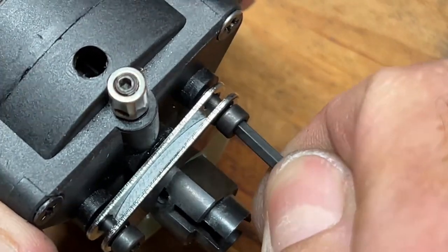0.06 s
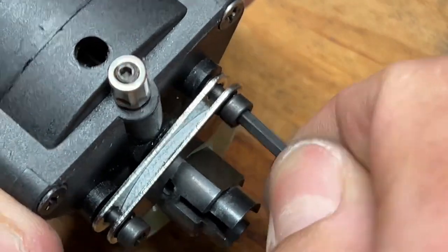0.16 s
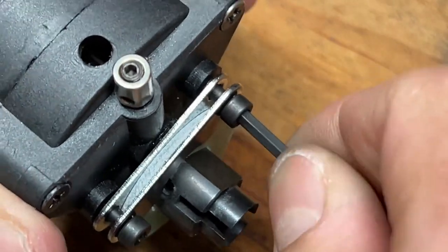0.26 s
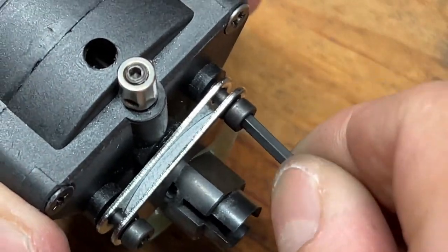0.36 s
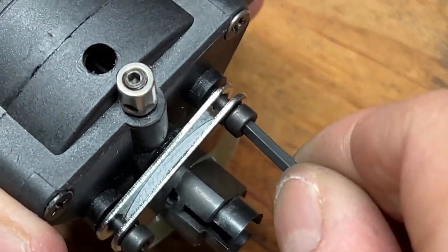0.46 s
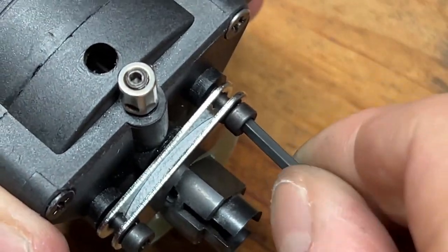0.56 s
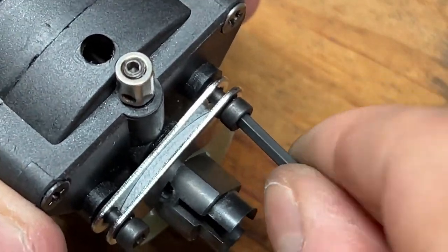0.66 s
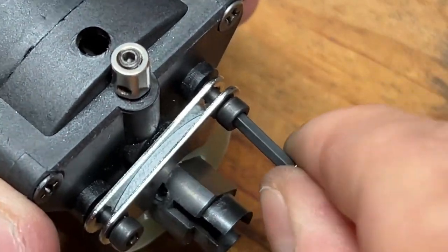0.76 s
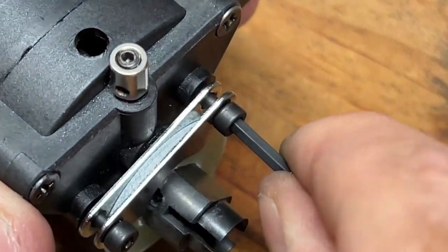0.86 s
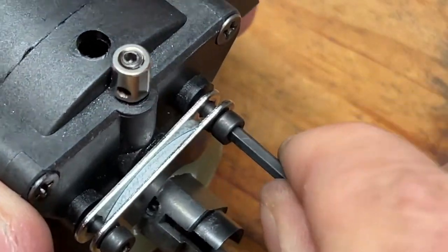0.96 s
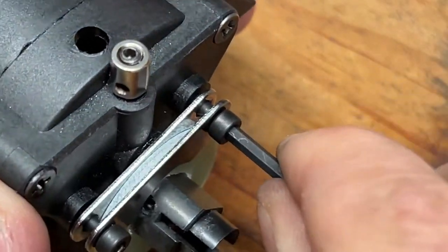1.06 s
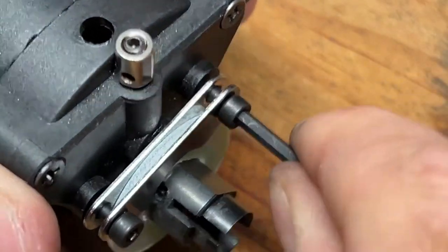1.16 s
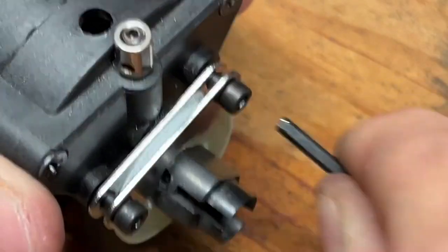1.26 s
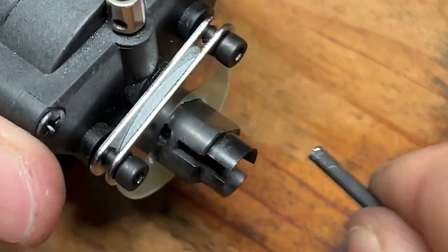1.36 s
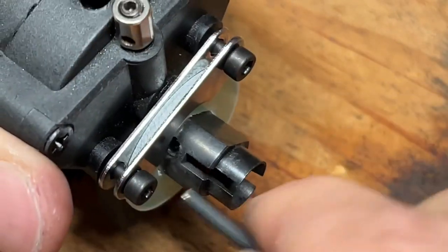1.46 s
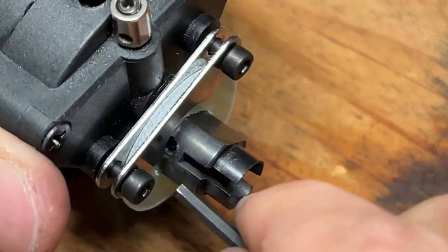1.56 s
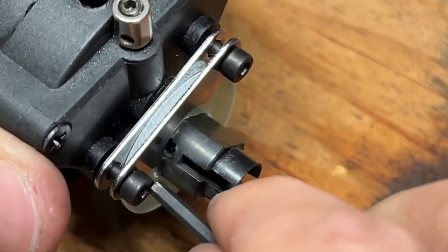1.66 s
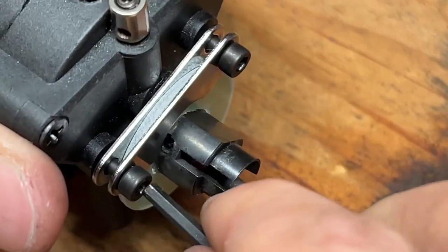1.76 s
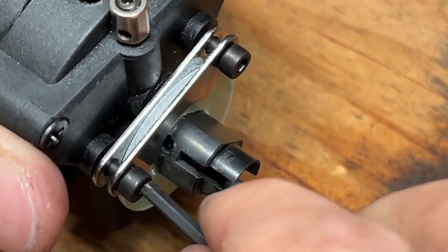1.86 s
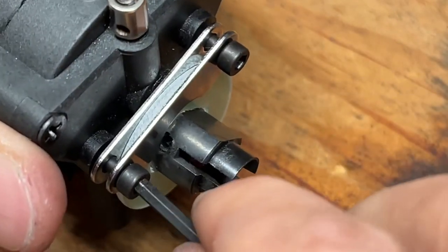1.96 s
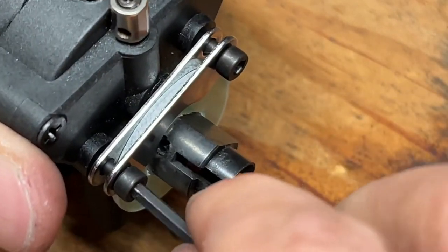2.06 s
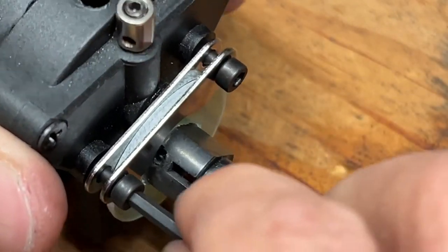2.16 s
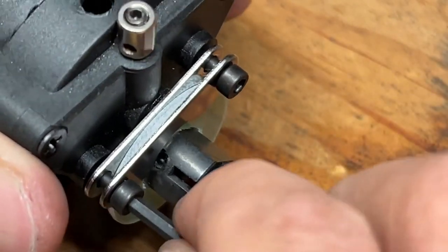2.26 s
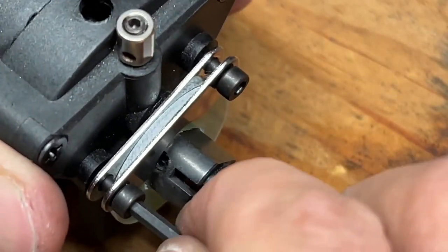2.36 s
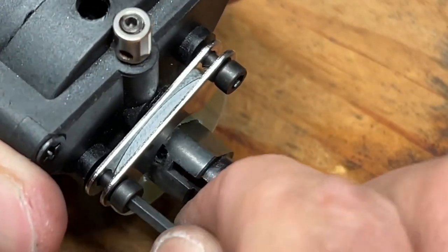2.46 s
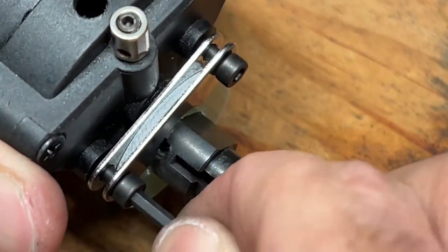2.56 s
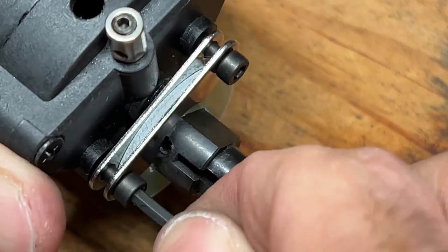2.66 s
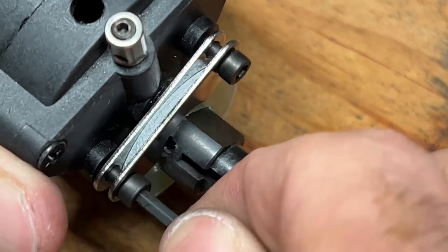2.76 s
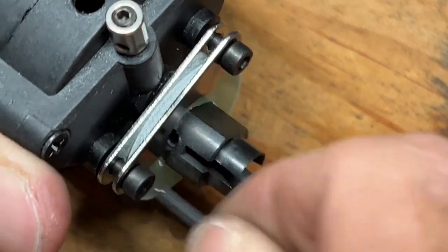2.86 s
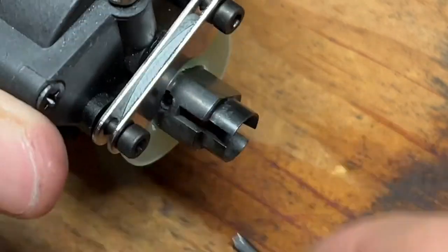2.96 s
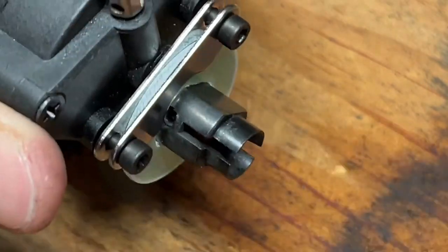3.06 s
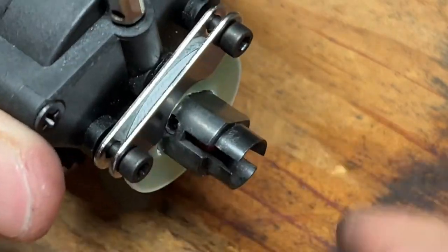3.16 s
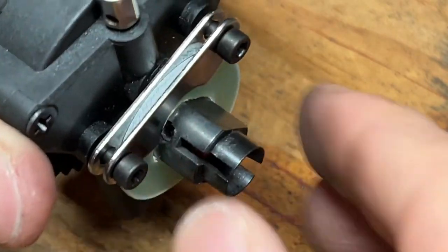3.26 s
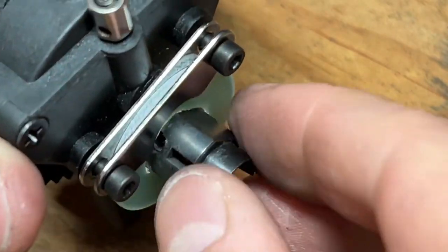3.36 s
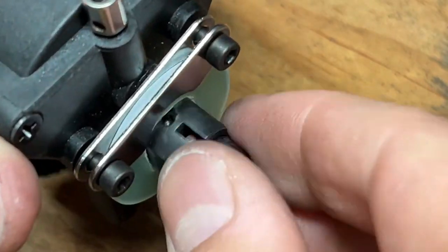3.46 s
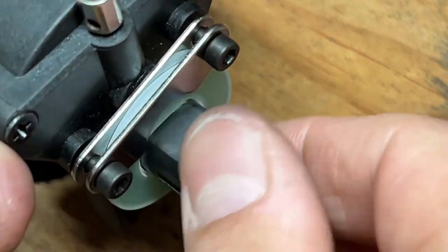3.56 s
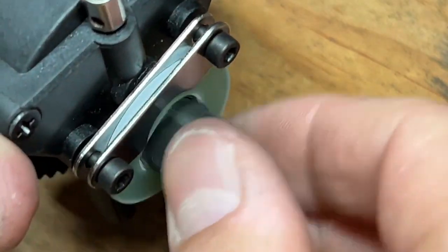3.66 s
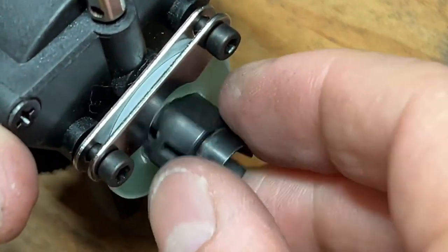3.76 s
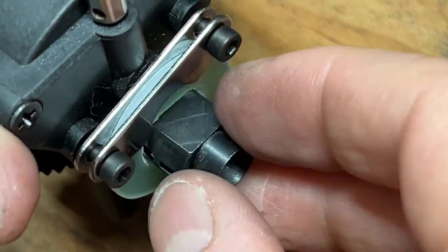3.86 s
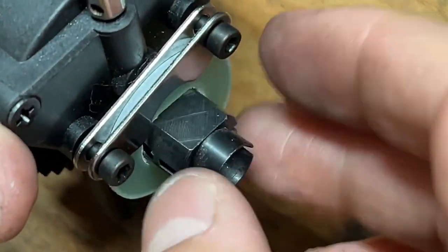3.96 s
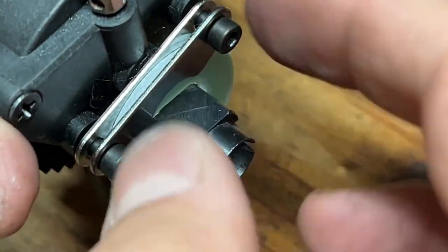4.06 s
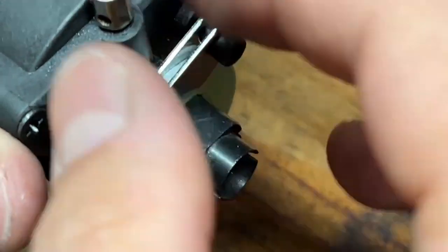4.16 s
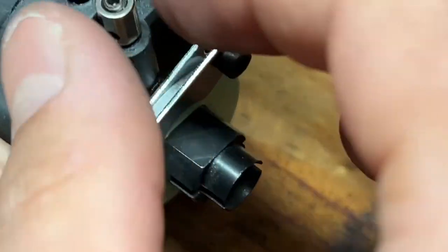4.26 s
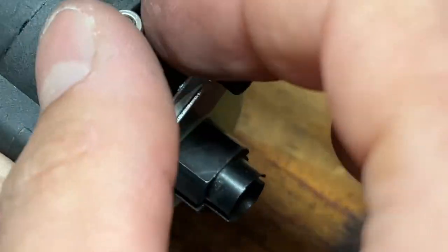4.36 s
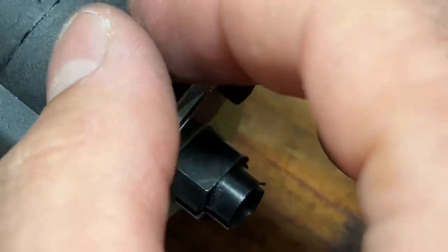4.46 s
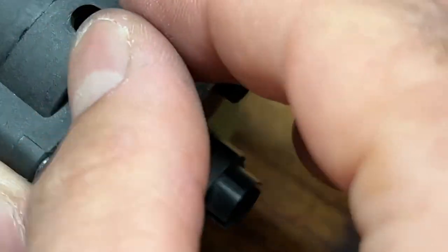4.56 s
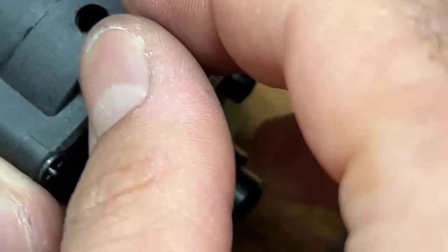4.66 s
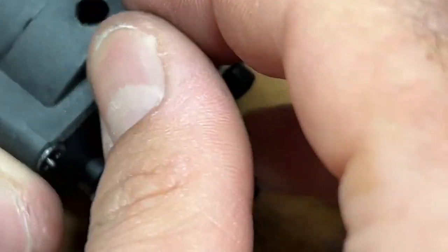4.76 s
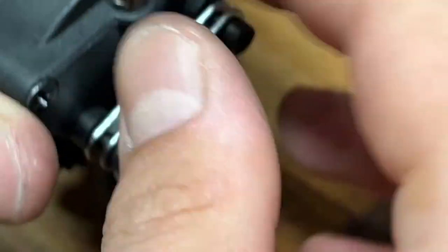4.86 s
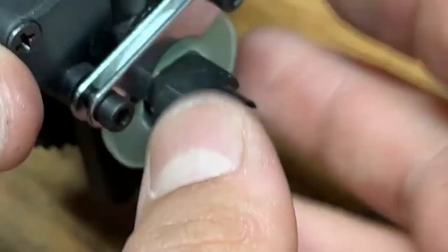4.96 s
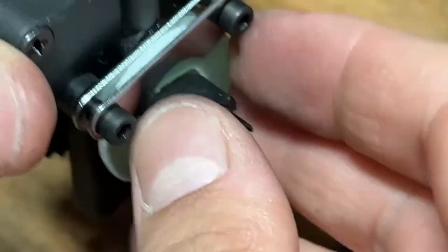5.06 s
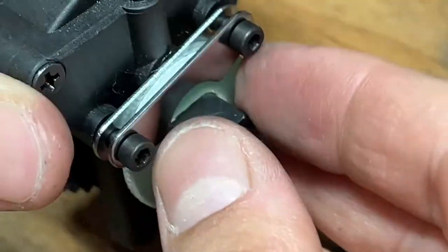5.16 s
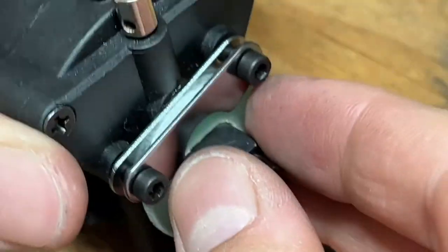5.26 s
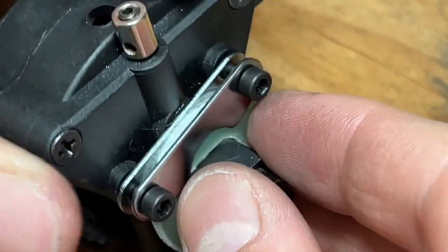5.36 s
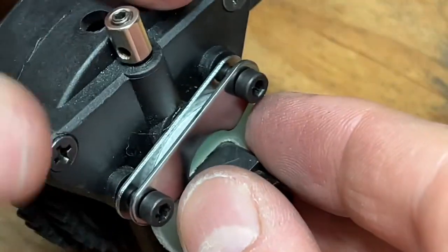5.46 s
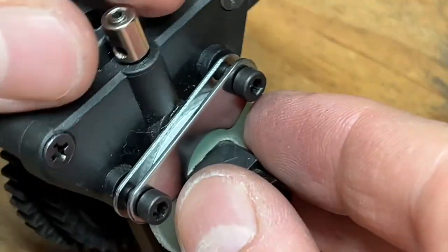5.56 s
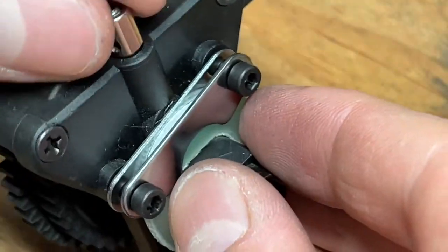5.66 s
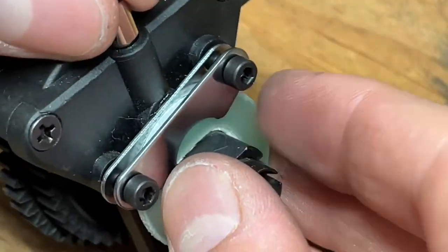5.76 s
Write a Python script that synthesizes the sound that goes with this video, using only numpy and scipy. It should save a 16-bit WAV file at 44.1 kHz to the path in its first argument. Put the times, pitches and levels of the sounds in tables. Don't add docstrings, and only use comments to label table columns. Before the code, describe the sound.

Close stereo phone pickup, small indoor workspace with soft low rumble and little reverberation. First near silence, then thin steel-on-steel clicks and short scrapes around one to two seconds. Just after three seconds a metal tool drops and rattles on wood, the loudest moment together with a later low hollow knock. Between them are two short gritty turns, faint ticks and skin rubs.

```python
import sys
import numpy as np
from scipy import signal
from scipy.fft import rfft, irfft
from scipy.io import wavfile
from scipy.ndimage import uniform_filter1d

SR = 44100
rng = np.random.default_rng(int(sys.argv[2]) if len(sys.argv) > 2 else 0)


def master(y):
    cut = np.clip(np.atleast_2d(y).T, -1, 1)
    pcm = np.round(cut * 32767)
    wavfile.write(sys.argv[1], SR, pcm.astype(np.int16))


def convert_level_to_amplitude(level_db):
    exponent = np.asarray(level_db, float) / 20
    return 10 ** exponent


N = 256484


def on_log(table, hz):
    f, v = np.transpose(table)
    return np.interp(np.log(np.maximum(hz, 1)), np.log(f), v)


def unit(x):
    return x / np.sqrt(np.mean(x ** 2))


def add(out, s, sound):
    i = int(s * SR)
    out[i:i + len(sound)] += sound[:N - i]


def bandpass(x, order, low_hz, high_hz):
    return signal.sosfilt(signal.butter(order, [low_hz, high_hz], "band", fs=SR, output="sos"), x)


def walk(rate):
    hold = int(SR / rate)
    steps = np.repeat(rng.standard_normal(N // hold + 1), hold)
    return 1.3 * uniform_filter1d(uniform_filter1d(steps, hold), hold)[:N]


# f/Hz, level/dB per Hz
ROOM_TONE = [(12, -46.5), (22, -18.5), (51, -5.5), (71, -1.5), (114, -15), (160, -17), (265, -27.5),
             (600, -31), (1050, -30.5), (1350, -38.5), (1750, -40.5), (2050, -49), (3300, -54.5),
             (7500, -57.5)]
# f/Hz, level/dB
AIR_TREBLE = [(7500, -1.5), (9000, -4.5), (12000, -3), (13500, -6), (16500, -15)]
# f/Hz, likeness of left and right/0-1
ROOM_LIKENESS = [(60, 1), (130, .95), (290, 0.6), (640, 0.5), (1410, 0.12), (2400, 0.6), (6820, 1),
                 (11000, 1), (16000, 0.2)]


def room():
    level_db = -57.5
    hz, out, swell = np.fft.rfftfreq(N, 1 / SR), 0, walk(0.45)
    left, other = rfft(rng.standard_normal((2, N)))
    like = np.clip(on_log(ROOM_LIKENESS, hz), 0, 1)
    right = like * left + np.sqrt(1 - like ** 2) * other
    both = convert_level_to_amplitude(on_log(ROOM_TONE, hz) + on_log(AIR_TREBLE, hz)) * np.array([left, right])
    octave = np.log2(np.maximum(hz, 16) / 16)
    for k in np.arange(0, 11, .5):
        share = np.clip(1 - 2 * np.abs(octave - k), 0, 1)
        wander_db = .4 * swell + 0.52 * walk(3.1) + 1.8 * walk(3.3) * (k < 3.6)
        out = out + irfft(both * share, N) * convert_level_to_amplitude(wander_db)
    return unit(out) * convert_level_to_amplitude(level_db)


# f/Hz, t60/s
WALL_T60 = [(200, 0.61), (600, 0.24), (1500, 0.36), (4000, .25), (12000, 0.046)]


def echo(x):
    wall_db, bench_db, bench_t60_s = -22.5, -9.5, 0.041
    t, tail = np.arange(SR // 2) / SR, 0
    common, *own = rng.standard_normal((3, len(t)))
    for hz in 125. * 2 ** np.arange(7):
        unlike = 1.4 if hz < 1500 else .25
        octave = bandpass(common + unlike * np.array(own), 2, hz / 2 ** .5, hz * 2 ** .5)
        tail = tail + octave * convert_level_to_amplitude(-60 * t / on_log(WALL_T60, hz))
    tail = tail * np.clip(t / 0.014, 0, 1)
    highpass = signal.butter(1, 700, "high", fs=SR, output="sos")
    early = signal.sosfilt(highpass, common + 1.5 * np.array(own))
    early = early * convert_level_to_amplitude(-60 * t / bench_t60_s) * np.clip(t / 0.0015, 0, 1)
    both = convert_level_to_amplitude(wall_db) * unit(tail) + convert_level_to_amplitude(bench_db) * unit(early)
    return signal.fftconvolve(x[None], both / np.sqrt(len(t)), axes=1)[:, :N]


def wide_board(x):
    level_db, t60_s = -17, .025
    t = np.arange(SR // 10) / SR
    scatter = rng.standard_normal(len(t)) * convert_level_to_amplitude(-60 * t / t60_s)
    scatter = bandpass(scatter, 1, 400, 3242)
    side = signal.fftconvolve(x, unit(scatter) / np.sqrt(len(t)))[:N] * convert_level_to_amplitude(level_db)
    return np.array([side, -side])


# f/Hz, left lead/rad
LEFT_LEAD = [(0, 0), (300, -.1), (430, .4), (650, 0), (760, .7), (850, 1.5), (980, -.3), (1300, -.4),
             (1600, .2), (2000, -.1), (3100, .6), (5200, .3), (6200, 0), (7900, .25), (8600, -.3),
             (10000, -2.8), (10600, -3.6), (12100, -6.3), (13400, -9.2), (14100, -9.8), (16500, -14.5)]
# f/Hz, left minus right level/dB
LEFT_MINUS_RIGHT = [(60, 0.5), (110, -2), (200, 0.5), (380, -0.5), (700, 2), (1290, -0.5), (2380, -0.5),
                    (4400, -0.5), (8120, 0.5), (15000, -0.5)]


def ports(x):
    hz = np.fft.rfftfreq(N, 1 / SR)
    lead = np.interp(hz, *np.transpose(LEFT_LEAD))
    half = np.exp(.5j * lead) * convert_level_to_amplitude(on_log(LEFT_MINUS_RIGHT, hz) / 2)
    return irfft(rfft(x) * np.array([half, 1 / half]), N)


def strike(db, ms, modes, spot_db, chatter, spread, low_hz, length, swell=.01, top_hz=17000):
    hz, mode_db, t60 = np.repeat(np.transpose(modes), 3, axis=1)[:, :, None]
    t = np.arange(int(length * SR)) / SR
    spot, detune = rng.standard_normal((2, len(hz), 1))
    ring = convert_level_to_amplitude(mode_db + spot_db * spot) * np.sin(2 * np.pi * hz * (1 + spread * detune) * t)
    ring = ring * (1 - np.exp(-(hz * t / swell) ** 2))
    ring = np.sum(ring * np.exp(-np.log(1000) * t / np.maximum(t60, .005)), axis=0)
    u = t[:1024] * 1000 / max(ms, .02)
    hits = rng.standard_normal(1024) * convert_level_to_amplitude(6.0 * rng.exponential(size=1024))
    push = u * np.exp(-u) * (1 - chatter + chatter * unit(hits))
    sound = bandpass(signal.fftconvolve(ring, push), 2, low_hz, top_hz)
    return sound * convert_level_to_amplitude(db) / np.abs(sound).max()


# t/s, peak level/dB, contact/ms
BOX_KNOCKS = [
    (2.08, -55, 0.51),
    (3.359, -59.5, 0.84),
    (5.337, -18.5, 0.44),
    (5.788, -50, 11),
]
# f/Hz, level/dB, t60/s
HOLLOW_MODES = [(110.3, -10.5, 0.14), (156.3, -5, 0.12), (278.6, -4, 0.11), (335.3, 6, 0.076),
                (334, -28, 0.75), (441.2, -0.5, 0.072), (504, 9.5, 0.037), (594, 1, 0.029),
                (697, -7, 0.069), (854, -10, 0.027), (1180, -15, 0.025), (1844, -22, 0.019),
                (2630, -27, 0.01)]


def knocks():
    out = np.zeros(N)
    for s, db, ms in BOX_KNOCKS:
        add(out, s, strike(db, ms * 0.093, HOLLOW_MODES, 0.36, 0, 0.012, 70, length=0.57, swell=1.0))
    return out


def resonate(x, peaks):
    return unit(sum(convert_level_to_amplitude(db) * signal.lfilter(*signal.iirpeak(hz, hz / width, fs=SR), x)
                    for hz, width, db in peaks))


# f/Hz, width/Hz, level/dB
RUB_HIGH = [(5000, 300, 5.5), (6170, 1100, 2), (7430, 1200, -0.5), (9015, 740, -4), (10640, 1100, -4.5),
            (11600, 1400, -2), (13180, 6600, -6), (15200, 1100, 3)]


def slide(slips, t, db, treble_db, low_peaks, grip):
    part = slips[int(t[0] * SR):][:len(t)]
    shell = bandpass(part, 2, 2050, 4300)
    low = resonate(shell, np.array(low_peaks) * [grip, 1, 1])
    high = resonate(part, RUB_HIGH)
    touch = np.clip(np.minimum(t - t[0], t[-1] - t) / 0.003, 0, 1)
    return touch * convert_level_to_amplitude(db) * (low + convert_level_to_amplitude(treble_db) * high)


# t/s, pressure level/dB
SHAFT_TURNS = [
    [(3.375, -79), (3.40, -73), (3.465, -62), (3.508, -63), (3.514, -61), (3.528, -61), (3.586, -58),
     (3.598, -64), (3.61, -84)],
    [(3.61, -82), (3.63, -60.5), (3.66, -59.5), (3.668, -58), (3.735, -63.5), (3.751, -58), (3.821, -69.5),
     (3.857, -88), (3.9, -99)],
]
# t at strongest/s, level/dB, rise/s, fall/s, treble minus level/dB
SHORT_SLIDES = [(0.143, -79, 0.011, 0.029, -25), (0.299, -92.5, 0.28, .25, -21), (.6, -90, 0.16, 0.27, -22),
                (1.12, -85.5, 0.4, 0.22, -12), (1.216, -66.5, 0.016, 0.0073, 0),
                (1.2254, -53, 0.0031, 0.0037, 0.5), (1.24, -79, .01, 0.14, -12),
                (1.654, -70, 0.0064, 0.11, -2), (1.88, -54, 0.024, 0.012, 6), (1.89, -79, .01, 0.093, -10),
                (2.008, -71, .01, 0.062, -2), (2.079, -60.5, 0.018, 0.037, -6),
                (2.163, -69, 0.026, 0.032, -9), (2.205, -78.5, .01, 0.15, -7), (2.84, -73, 0.01, 0.068, -2),
                (2.96, -82, 0.023, 0.091, -2), (4.319, -77.5, 0.018, 0.11, -18),
                (4.485, -76, 0.043, 0.075, -15), (4.798, -71, 0.053, 0.053, -11),
                (4.7, -85, 0.034, 0.038, -3), (4.99, -85, 0.042, .03, 3), (4.89, -76, 0.085, 0.081, -7),
                (5.039, -72, 0.067, 0.15, -5.5), (5.18, -80, 0.068, 0.053, -5.5),
                (5.225, -77, 0.082, 0.045, -3.5), (5.26, -70, 0.02, 0.027, -5.5),
                (5.38, -83, 0.16, 0.14, -3), (5.55, -82.5, 0.027, 0.048, 1.5), (5.62, -82, 0.029, 0.039, 6),
                (5.6, -83.5, 0.18, 0.38, -11), (5.788, -68, 0.011, 0.047, -4)]
# t/s, pitch factor
GRIP_PITCH = [(1.1, 0.94), (2.3, 1.1), (4.3, 1.05), (4.9, 1.08), (5.15, 1.04), (5.25, 1.15), (5.4, 1.05),
              (5.55, 1.14), (5.8, 1.21)]
# f/Hz, width/Hz, level/dB
SHAFT_LOW = [(1105, 890, -7), (2460, 510, -1.5), (2953, 160, 13.5), (3200, 480, -9), (3700, 460, -3)]
# f/Hz, width/Hz, level/dB
BRUSHED_LOW = [(2450, 380, 1), (2910, 550, 0), (3660, 160, -6), (4268, 260, -9.5)]


def rubs():
    swing_db, tilted_s = 30, 5.11
    full_db, full_treble_db, dull_db_per_db = -60, 1.5, 1
    out = np.zeros(N)
    uneven_db = 2.0 * rng.exponential(size=N) + 2.7 * walk(250) + 0.78 * walk(60)
    slips = rng.standard_normal(N) * convert_level_to_amplitude(uneven_db)
    for turn in SHAFT_TURNS:
        s, db = np.transpose(turn)
        t = np.arange(s[0], s[-1], 1 / SR)
        pressure_db = np.interp(t, s, db)
        treble_db = full_treble_db + dull_db_per_db * np.clip(pressure_db - full_db, -12, 0)
        add(out, s[0], slide(slips, t, pressure_db, treble_db, SHAFT_LOW, 1.0))
    for s, db, rise, fall, treble_db in SHORT_SLIDES:
        rise, fall = max(rise, .004), max(fall, .004)
        t = np.arange(s - rise, min(s + fall, (N - 2) / SR), 1 / SR)
        peaks = BRUSHED_LOW if s < tilted_s else SHAFT_LOW
        swell_db = db - swing_db * np.where(t < s, (s - t) / rise, (t - s) / fall) ** 1.4
        grip = np.interp(s, *np.transpose(GRIP_PITCH))
        add(out, t[0], slide(slips, t, swell_db, treble_db, peaks, grip))
    return out


def scuff(db, top_hz):
    level_db, t60_s = -27, .08
    t = np.arange(SR // 8) / SR
    grit = rng.standard_normal(len(t)) * convert_level_to_amplitude(2.0 * rng.exponential(size=len(t)))
    hiss = unit(bandpass(grit, 5, 1800, min(12900, 1.5 * top_hz)))
    return hiss * convert_level_to_amplitude(db + level_db - 60 * t / t60_s) * np.clip(t / .002, 0, 1)


# t/s, bench peak level/dB, steel minus bench level/dB, contact/ms
KEY_LANDINGS = [(3.0872, -17, -11, 0.39), (3.0899, -19.5, 9, 0.64), (3.0911, -17, 4, 0.78),
                (3.0927, -15, 1.5, 0.35), (3.0940, -16.5, -1, 0.6), (3.0959, -24.5, -6.5, 0.7),
                (3.0978, -26.5, -6, 0.78), (3.1007, -29, -3.5, 0.5), (3.1091, -31, -3, 1.2),
                (3.135, -49.5, 8, 2.5), (3.1388, -28, 8.5, .3), (3.1412, -34.5, 7, 0.33),
                (3.152, -14, -7.5, 0.39), (3.156, -22, -2.5, 0.37), (3.1589, -27.5, -4, .6),
                (3.166, -36, 0.5, 1), (3.177, -29.5, -5, 0.8), (3.1815, -25.5, 1.5, 0.64),
                (3.1857, -20, -12.5, .5), (3.189, -28, -5.5, 1.1), (3.2154, -23.5, -13, 0.59),
                (3.2177, -29, -12, 0.58), (3.221, -32, -25, 0.58), (3.2544, -33, -2, 0.91),
                (3.268, -33.5, -28, 1.5), (3.272, -36, -23, 1.5), (3.287, -43.5, -25, 5.6),
                (3.299, -52, -27, 7.5)]
# f/Hz, level/dB, t60/s
BENCH_MODES = [(175, -10, 0.082), (254.5, -13.5, 0.053), (443, -13.5, 0.07), (495, -9.5, .035),
               (714.4, -6, 0.045), (804, -13.5, 0.083), (1022, -1.5, 0.024), (1160, -6, 0.02),
               (1272, -5, 0.022), (1430, -5, 0.026), (1593, -3.5, 0.029), (1890, -10.5, 0.034),
               (2270, -9.5, 0.031), (2670, -7.5, .012), (3300, -5.5, .012), (4040, -9.5, 0.0092)]
# f/Hz, level/dB, t60/s
KEY_MODES = [(2390, -8, 0.02), (2640, -12, 0.034), (2880, -8, 0.013), (3250, -6.5, 0.012),
             (3480, -4.5, 0.012), (4020, -12.5, 0.023), (4518, -9, 0.021), (4940, -9.5, 0.025),
             (5588, 1, 0.015), (6620, -8, 0.025), (7317, -7.5, 0.02), (7800, -6.5, 0.011),
             (8385, -2, 0.0092), (9030, -8.5, 0.013), (10100, -13.5, 0.011), (11600, -11, 0.0075),
             (13300, -18.5, 0.0091), (14500, -26.5, .008), (15600, -27, .012)]
# from t/s, until t/s, f/Hz, level/dB, t60/s
KEY_SINGING = [
    (3.094, 3.141, 9822, -43, 2.0),
    (3.108, 3.146, 14300, -66, 2.0),
    (3.094, 3.17, 15450, -70, 1.0),
    (3.093, 3.139, 11010, -55, .4),
    (3.148, 3.25, 11010, -54, .4),
    (3.25, 3.3, 11010, -74, .3),
    (3.115, 3.138, 3640, -54, .4),
    (3.157, 3.24, 5200, -54, .35),
]


def dropped_key():
    tumble_depth_db, tumble_per_s = 4, 110
    out = np.zeros(N)
    for s, db, steel_db, ms in KEY_LANDINGS:
        thud = strike(db, ms * 0.054, BENCH_MODES, 2.7, .2, 0.019, 340, length=.12, swell=0.24, top_hz=5200)
        add(out, s, -thud)
        reach_hz = np.clip(16000 * convert_level_to_amplitude(0.87 * (db + steel_db + 14.5)), 4000, 16000)
        rattle = strike(db + steel_db, ms * 0.72, KEY_MODES, 2.5, 0.97, 0.03, 2300, length=.06, top_hz=reach_hz)
        add(out, s, rattle)
        add(out, s, scuff(db + 0.46 * steel_db, reach_hz))
    for s, until, hz, db, t60 in KEY_SINGING:
        t = np.arange(int((until - s) * SR)) / SR
        edges = np.clip(np.minimum(t, until - s - t) / 0.0032, 0, 1)
        tumble_db = tumble_depth_db * walk(tumble_per_s)[:len(t)]
        add(out, s, edges * convert_level_to_amplitude(db + tumble_db - 60 * t / t60) * np.sin(2 * np.pi * hz * t))
    return out


# t/s, peak level/dB, treble minus peak level/dB, loudest box mode f/Hz, contact/ms
SCREW_TICKS = [(1.224, -37.5, -13, 2670, 1.77), (1.6419, -37, 6, 2490, 0.85), (1.667, -49, -7, 2450, 3.7),
               (1.700, -54, -11, 2560, 0.98), (1.737, -66, -18, 4240, 1.5), (1.854, -44, -13.5, 3250, 0.7),
               (1.8684, -41, -9, 2380, 0.37), (1.8792, -34, -8, 2450, 0.8), (1.9968, -35.5, -6, 2500, 0.82),
               (2.0798, -29.5, -20, 2960, 0.62), (2.166, -50, -31, 2525, 1.2),
               (2.2047, -46, -42, 2940, 1.3), (2.8405, -57, -3, 2700, 4), (2.9598, -59.5, -29, 2480, 2.3)]
# t/s, peak level/dB, treble minus peak level/dB, loudest box mode f/Hz
LOOSE_TICKS = [(3.3581, -35, -36, 2340), (3.4575, -50, -15, 2330), (3.5208, -47, -10, 2930),
               (3.5654, -43.5, -21, 2960), (3.597, -49, -25, 2960), (3.631, -59, -17, 2960),
               (3.671, -51, -10, 2880), (3.694, -54, -13, 2960), (3.747, -59, -5, 4900),
               (4.304, -52, -36, 2463), (4.3316, -60, -23, 2450), (4.787, -62, -27, 2510),
               (4.878, -50.5, -34, 3000), (5.007, -45.5, -22, 2990), (5.0098, -46, -14.5, 5200),
               (5.0408, -52, -23, 2940), (5.0562, -62, -13, 2960), (5.085, -57.5, -10.5, 2835),
               (5.173, -67.5, -5, 3294), (5.233, -57, -11, 3300), (5.2598, -61, -1, 3500),
               (5.3381, -58, -21, 2880), (5.3651, -63.5, -13, 2920), (5.376, -64.5, -10, 2880),
               (5.382, -60, -10.5, 5770), (5.5202, -57, -22, 3430), (5.784, -63, 6.5, 3380),
               (5.7985, -67.5, 7.5, 3280)]
# f/Hz, level/dB, t60/s
BOX_MODES = [(1398, -5, 0.0049), (2000, -11, 0.0041), (2490, -2, 0.021), (2960, -4, 0.02),
             (3256, -8.5, 0.016), (3788, -7.5, 0.01), (4240, -8.5, 0.013), (5200, -10, 0.011),
             (5550, -14, .012)]
# f/Hz, level/dB, t60/s
STEEL_MODES = [(5204, -4.5, 0.011), (5600, -6.5, 0.011), (6300, -13, 0.0099), (6740, -3, 0.014),
               (7300, 1.5, 0.025), (7997, 4.5, 0.012), (8370, -7.5, .014), (8850, -3, 0.0061),
               (10200, -0.5, 0.0093), (11950, -6, 0.015), (10900, -7.5, 0.011), (13000, -4, 0.01),
               (15140, -25, 0.015)]


def ticks():
    part_contact_ms = 1.55
    out = np.zeros(N)
    for s, db, treble_db, hz, ms in SCREW_TICKS + [(*row, part_contact_ms) for row in LOOSE_TICKS]:
        modes = BOX_MODES + [(hz, 2.5, .013)]
        add(out, s, strike(db - 0.5, ms * .5, modes, 1.4, 0.4, 0.012, 2100, length=0.045, top_hz=6300))
        steel_db = db + treble_db + 11.5
        add(out, s, strike(steel_db, ms * 0.47, STEEL_MODES, 2.2, 0.95, 0.013, 3008, length=.04))
    return out


def scene():
    light, key = ticks() + rubs(), dropped_key()
    heavy = key + knocks()
    walls = echo(0.85 * light + heavy)
    return ports(light + heavy + walls + room() + wide_board(key))


def band_limit(x):
    return signal.sosfilt(signal.butter(12, 16810, fs=SR, output="sos"), x)


# f/Hz, width/Hz, level/dB
TREBLE_DENTS = [(8280, 180, -7), (10300, 350, -13), (13750, 690, -13.5)]


def record(dry):
    top_hz = 15754
    hz = np.fft.rfftfreq(N, 1 / SR)
    treble_shape_db = sum(db * np.exp(-(2 * (hz - f) / width) ** 2) for f, width, db in TREBLE_DENTS)
    treble_shape_db = treble_shape_db - 32 / (1 + np.exp(-(hz - top_hz) / 80))
    mix = irfft(rfft(dry) * convert_level_to_amplitude(treble_shape_db), N)
    return band_limit(mix)


dry = scene()
out = record(dry)
master(out)
```